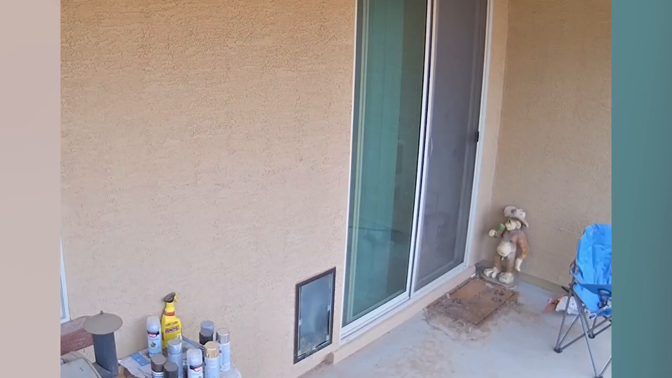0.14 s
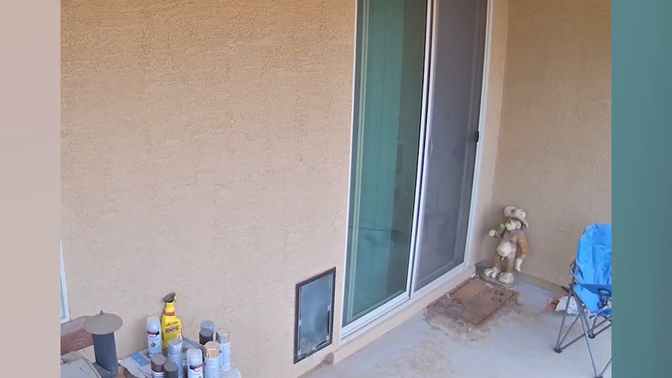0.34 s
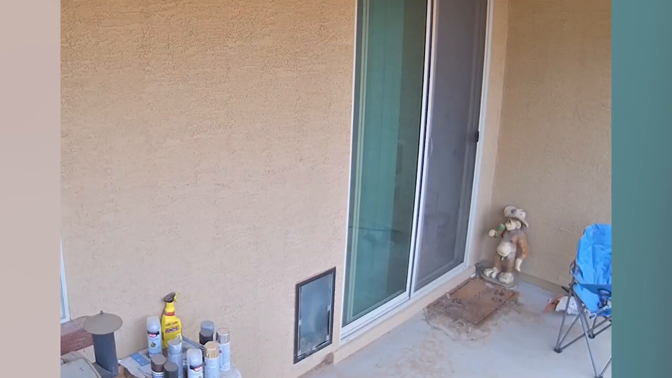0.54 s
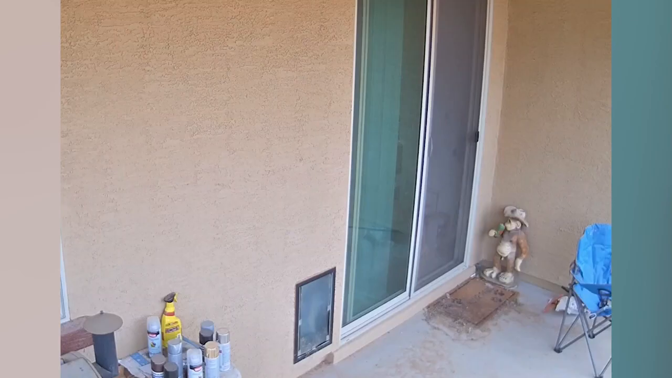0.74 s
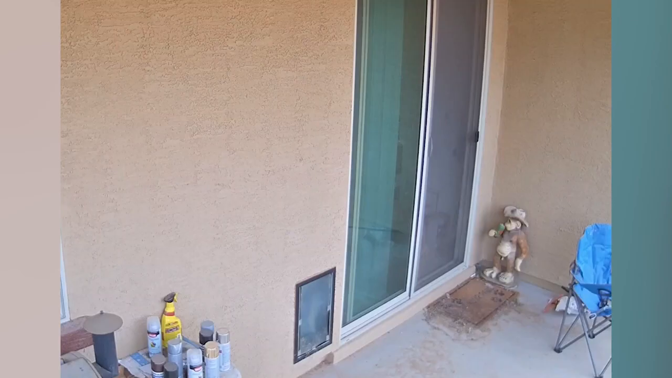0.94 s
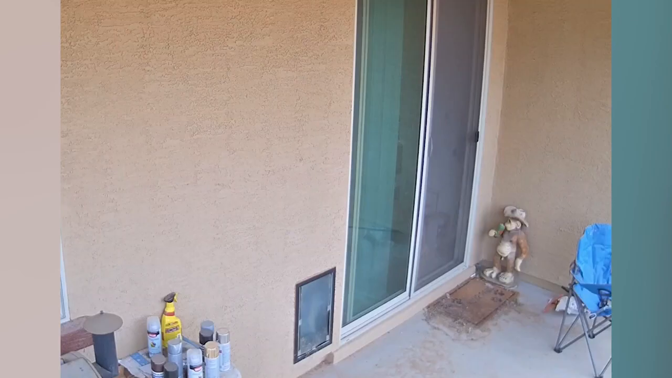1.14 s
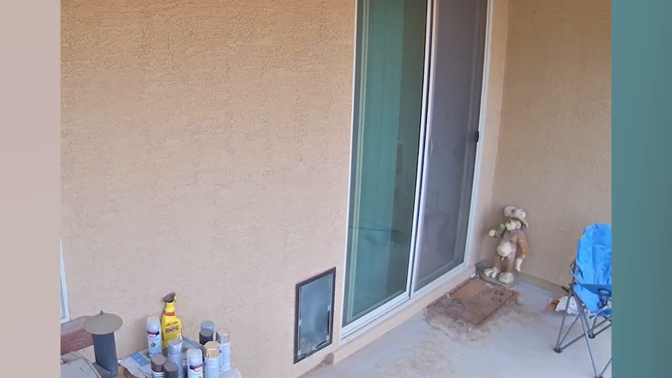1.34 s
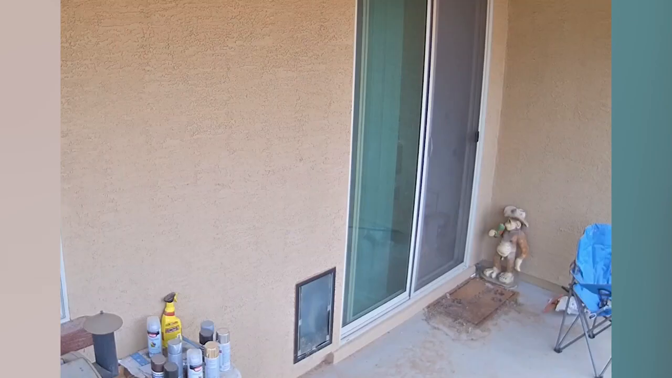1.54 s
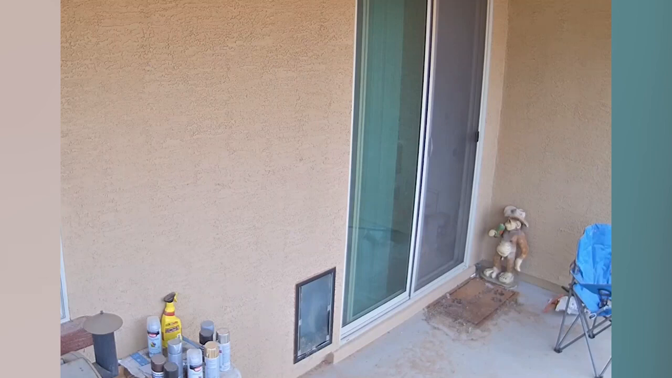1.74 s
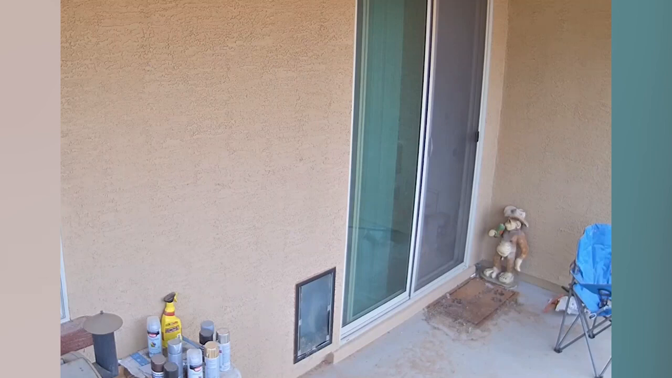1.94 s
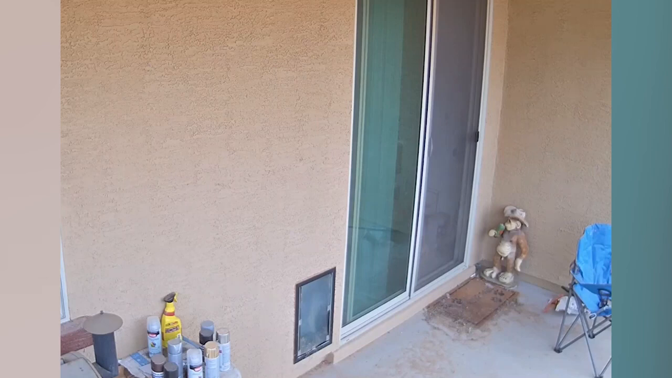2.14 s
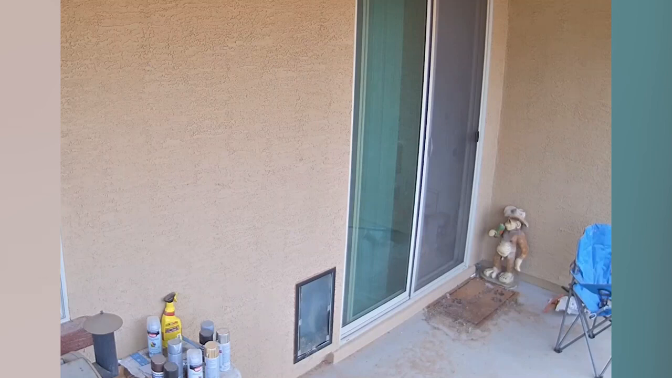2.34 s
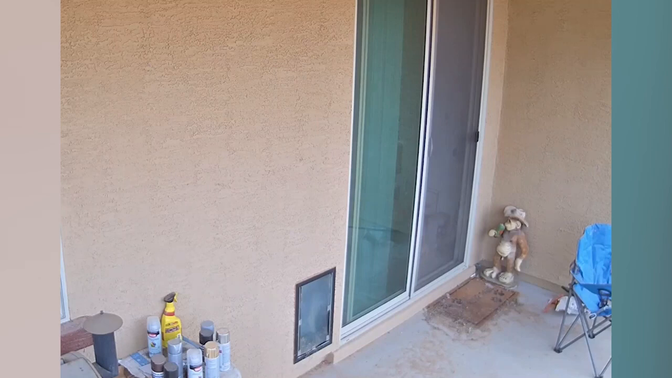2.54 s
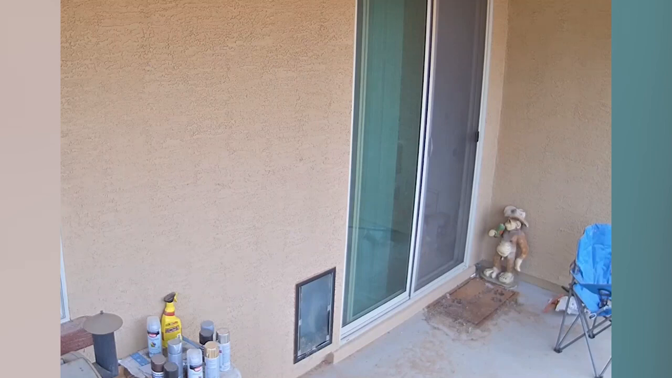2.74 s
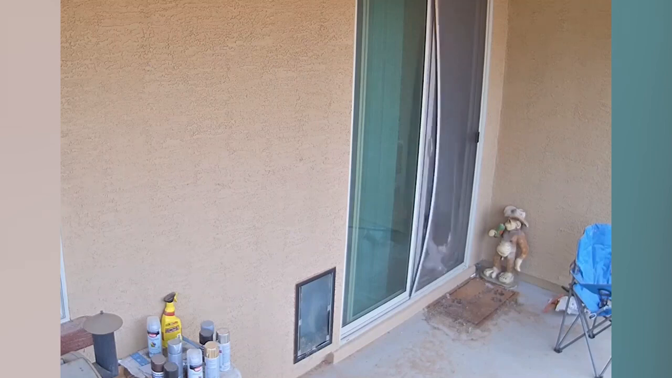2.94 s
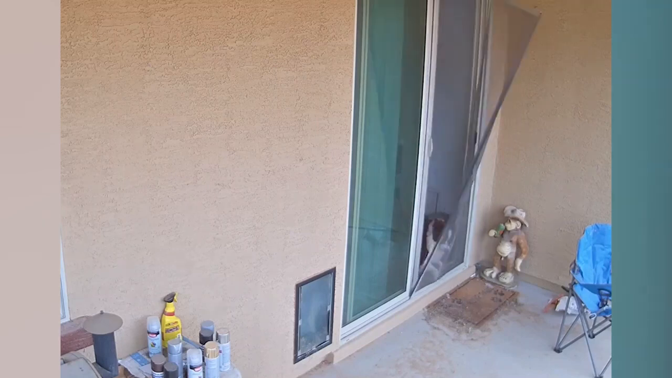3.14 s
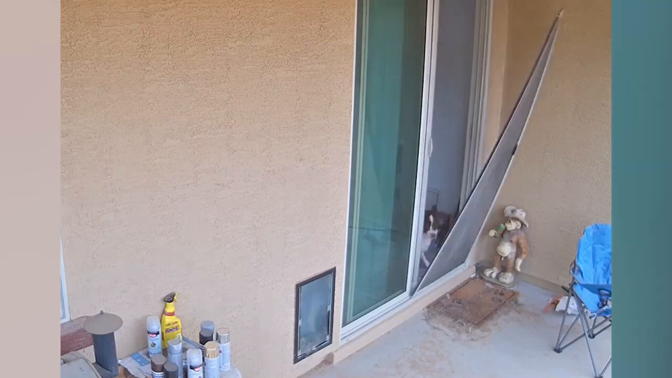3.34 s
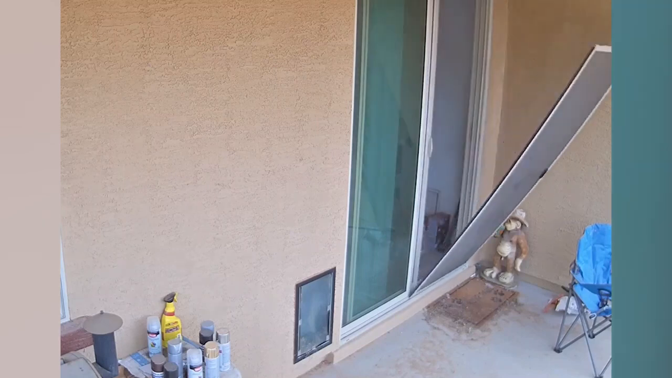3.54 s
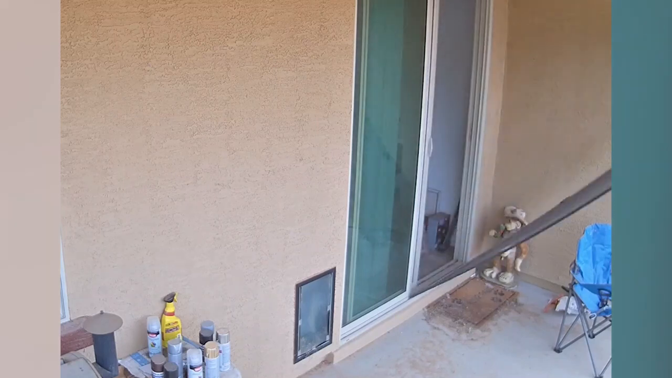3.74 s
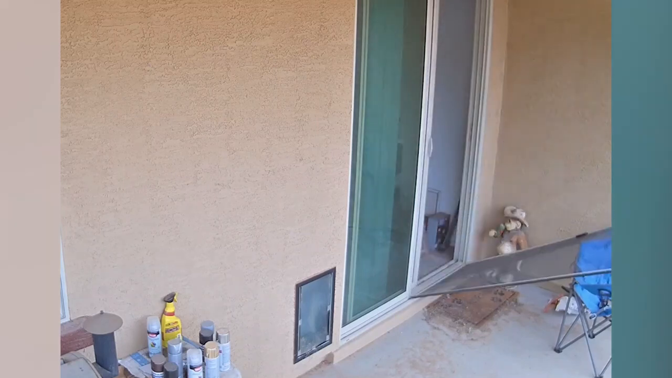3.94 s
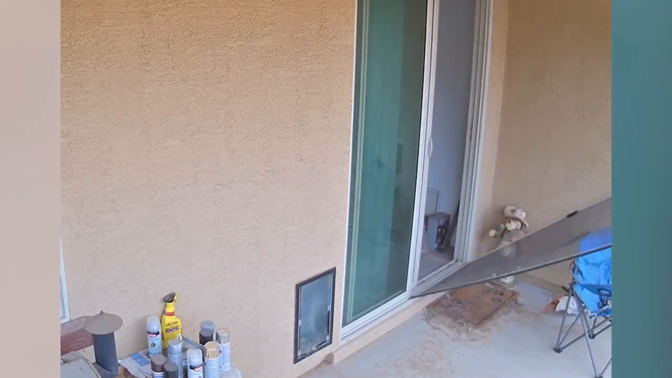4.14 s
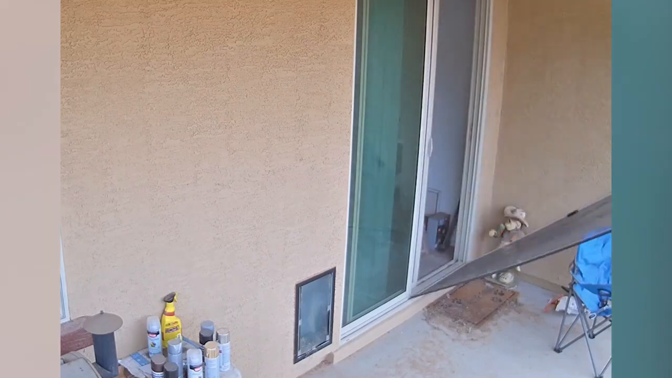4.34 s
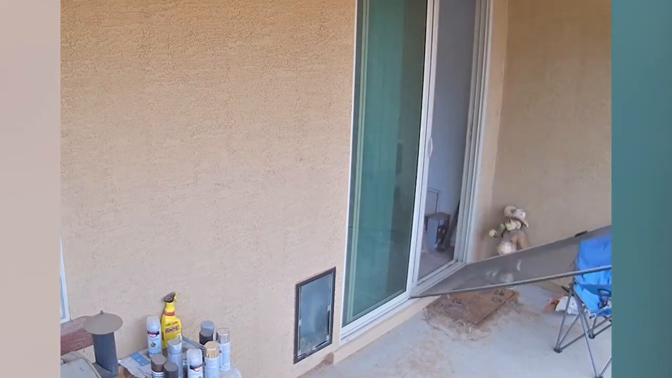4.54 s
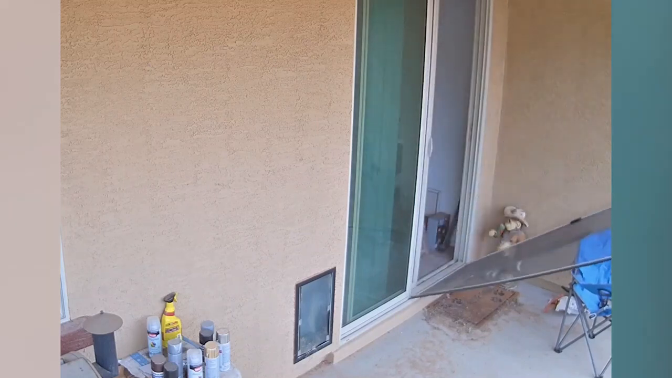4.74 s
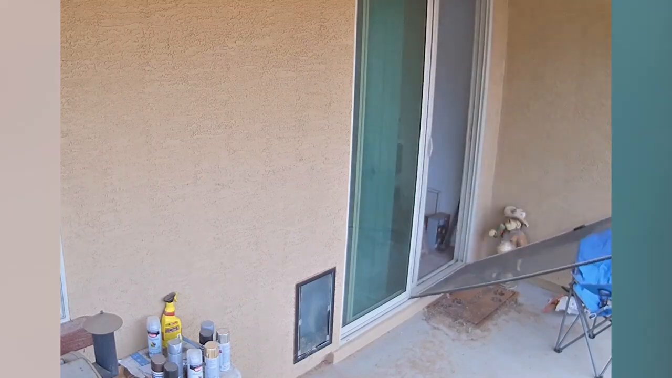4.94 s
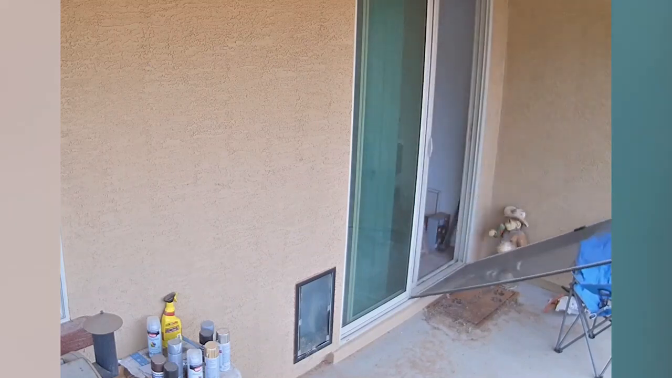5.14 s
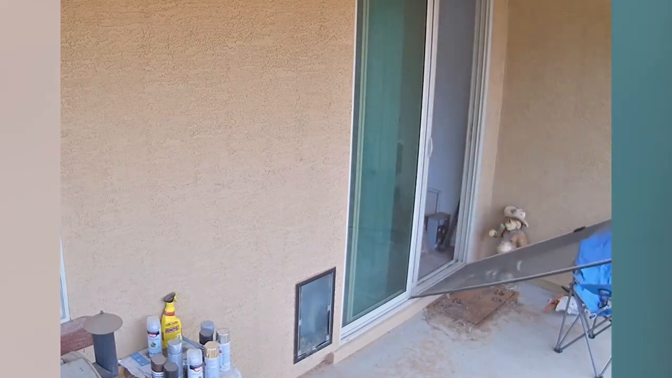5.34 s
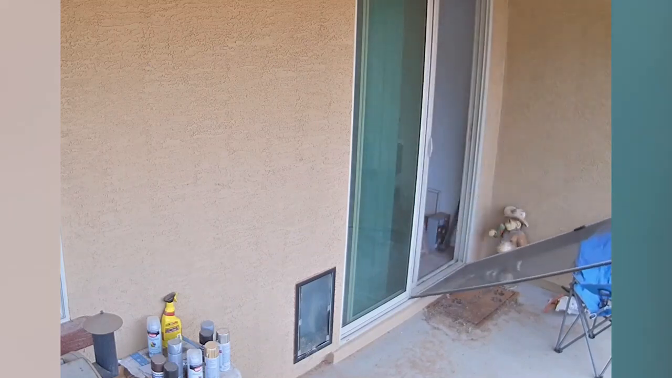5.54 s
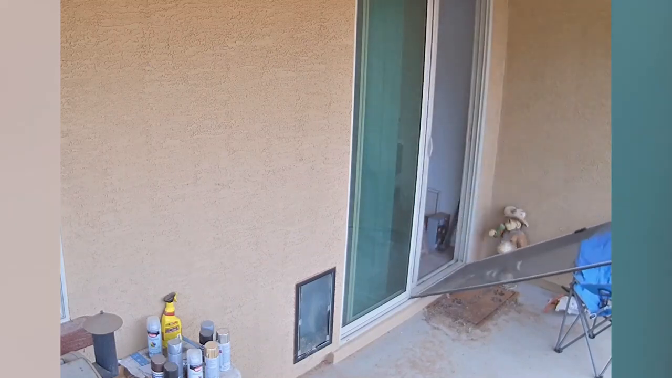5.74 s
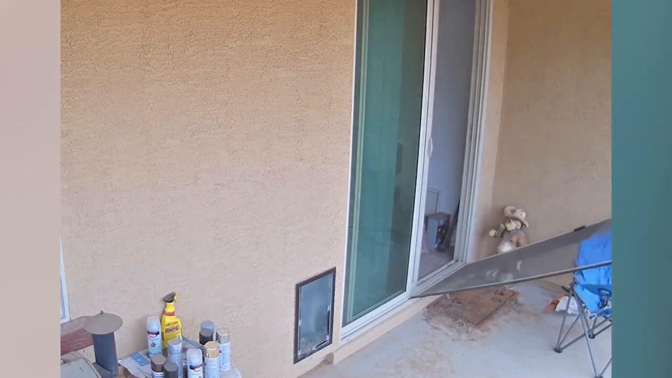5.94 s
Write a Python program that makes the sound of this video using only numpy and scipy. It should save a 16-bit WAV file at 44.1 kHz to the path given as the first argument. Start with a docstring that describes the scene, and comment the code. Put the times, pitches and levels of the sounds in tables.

```python
"""A finch sings gliding whistles over a yard's filtered noise hum, while grainy scuffs and damped wooden taps
come from indoors. Then a light metal screen door is knocked out of its track on a covered patio, topples, lands
on a folding chair and bounces to rest: short noise bursts and a dense rattle ring the modes of its frame, and
decaying noise gives the short echo of the walls. The air pushed by the fallen door buffets the small microphone
as low noise and pressure puffs, and the finch sings again."""
import sys
import numpy as np
from scipy import signal
from scipy.fft import rfft, irfft
from scipy.io import wavfile
from scipy.ndimage import uniform_filter1d

SR = 44100
rng = np.random.default_rng(int(sys.argv[2]) if len(sys.argv) > 2 else 0)


def materialize(psi):
    """Save the field psi as 16-bit PCM at rate SR to the path in sys.argv[1].

    A 1-D psi becomes a single channel; in a 2-D psi each row is a channel.
    """
    bounded = np.clip(np.atleast_2d(psi).T, -1, 1)
    quanta = np.round(bounded * 32767).astype(np.int16)
    wavfile.write(sys.argv[1], SR, quanta)


N = 268128
T = np.arange(N) / SR  # time, s


def undb(db):
    """Decibel law: amplitude ratio of a level in dB."""
    return 10 ** (np.asarray(db) / 20)


def unit(x):
    """Normalisation to an rms of 1."""
    return x / np.sqrt(np.mean(x ** 2))


def decay(t, t60):
    """Exponential decay: the amplitude falls by 60 dB in t60 seconds."""
    return np.exp(-np.log(1000) * t / t60)


def band(x, lo_hz, hi_hz, order=2):
    """Band limitation by a Butterworth filter."""
    return signal.sosfilt(signal.butter(order, [lo_hz, hi_hz], "band", fs=SR, output="sos"), x)


def colour(x, points, size=2048):
    """Minimum-phase filtering through (Hz, dB) points by the folded cepstrum of the log gain; unit energy."""
    hz, db = np.transpose(points)
    bins_hz = np.arange(size // 2 + 1) * SR / size
    log_gain = np.interp(np.log(bins_hz + 1), np.log(hz), db) * np.log(10) / 20
    cepstrum = irfft(log_gain)
    cepstrum[1:size // 2] *= 2
    cepstrum[size // 2 + 1:] = 0
    impulse = irfft(np.exp(rfft(cepstrum)))
    return signal.fftconvolve(x, impulse / np.sqrt(np.sum(impulse ** 2)))[:len(x)]


def walk(rate):
    """Slow random modulation: levels held 1 / rate seconds, smoothed twice, rms 1."""
    hold = int(SR / rate)
    steps = np.repeat(rng.standard_normal(N // hold + 1), hold)
    return unit(uniform_filter1d(uniform_filter1d(steps, hold), hold)[:N])


def clicks(rate, spread_db):
    """Shot noise: random contacts of both signs, most small, a few larger; rms 1."""
    chance, sign, size = rng.random((3, N))
    sizes = undb(-spread_db * np.log(size + 0.031))
    return unit((chance < rate / SR) * np.sign(sign - .5) * sizes)


def add(out, s, x):
    """Superposition: adds x to out from s seconds on."""
    i = int(s * SR)
    out[i:i + len(x)] += x[:N - i]


def swells(times, dbs, rise_s, fall_s):
    """Energy addition of events that grow exponentially to a peak and die away exponentially."""
    power = 0
    for s, db in zip(times, dbs):
        power = power + undb(2 * db) * np.exp(2 * np.minimum((T - s) / rise_s, (s - T) / fall_s))
    return np.sqrt(power)


# Spectral shape of the neighbourhood: pitch_hz [Hz], level_db [dB, relative]
YARD_SPECTRUM = [(35, -24.5), (60, -9.5), (116, 1.5), (179, -7), (348, -9), (390, -11), (755, -14),
                 (970, -13), (2590, -21), (3180, -20.5), (4790, -26), (6450, -65.5), (11400, -46),
                 (14000, -73)]
YARD_DB = -54
TRAFFIC_DB, TRAFFIC_FADE_S = 5.5, 0.24  # lift of the lower bands at the start, time constant of its fading


def yard():
    """Ambient noise: octave bands that flicker a little; a distant vehicle lifts the lower ones at first."""
    out, swell = 0, walk(0.54)
    for hz in 70 * 2. ** np.arange(8):
        traffic_db = TRAFFIC_DB * np.exp(-T / TRAFFIC_FADE_S) * (hz < 2000)
        level_db = traffic_db + 0.87 * swell + 1.0 * walk(6.8)
        out = out + undb(level_db) * band(rng.standard_normal(N), hz, 2 * hz, order=1)
    return unit(colour(out, YARD_SPECTRUM)) * undb(YARD_DB)


PATIO_T60_S, PATIO_DB = 0.42, -4.5
WALL_S, WALL_DB = 0.0338, -26  # delay and level of the far wall's return


def patio(x, count=40):
    """Reverberation: direct sound, diffuse tail of walls, roof and slab, and a return from the far wall."""
    t = T[:int(.6 * SR)]
    tail = decay(t, PATIO_T60_S) * np.clip(t / 0.0018, 0, 1)
    wall = np.exp(-.5 * ((t - WALL_S) / 0.00066) ** 2)
    shape = undb(PATIO_DB) * tail / np.sqrt(np.sum(tail ** 2))
    shape += undb(WALL_DB) * wall / np.sqrt(np.sum(wall ** 2))
    out = x.copy()
    # the fine structure of the echo changes as the sources move: crossfade fresh random tails
    for k in range(count + 1):
        share = np.sqrt(np.clip(1 - np.abs(T / T[-1] * count - k), 0, 1))
        near = np.flatnonzero(share)
        echo = signal.fftconvolve((x * share)[near], shape * rng.standard_normal(len(t)))
        add(out, near[0] / SR, echo)
    return out


GARDEN_T60_S, GARDEN_DB = .6, -7


def garden(x):
    """Late reflection: the long thin echo of the song from fences and house fronts."""
    t = T[:SR]
    tail = decay(t, GARDEN_T60_S) * np.clip(t / 0.017, 0, 1) * rng.standard_normal(len(t))
    return undb(GARDEN_DB) * signal.fftconvolve(x, tail / np.sqrt(np.sum(tail ** 2)))[:N]


# Blurred warbles: start_s [s], length_s [s], first_hz [Hz], last_hz [Hz], level_db [dB, relative]
FAR_WARBLES = [(.8, 0.31, 3620, 3540, -54), (1.043, .42, 4120, 4280, -56), (5.077, .18, 3260, 3180, -52),
               (5.424, .2, 3060, 3133, -60)]
BLUR_HZ = 170  # half width of the smeared band


def far_birds():
    """Scattering: distance and echo smear gliding warbles into a narrow wavering band."""
    out = np.zeros(N)
    for s, length, first_hz, last_hz, db in FAR_WARBLES:
        u = np.arange(0, 1, 1 / (length * SR))
        lowpass = signal.butter(2, BLUR_HZ, fs=SR)
        blur = unit(signal.lfilter(*lowpass, rng.standard_normal(SR)))[-len(u):]
        pitch = first_hz + (last_hz - first_hz) * u
        glide = np.sin(2 * np.pi * np.cumsum(pitch) / SR)
        add(out, s, undb(db) * blur * np.sqrt(np.sin(np.pi * u)) * glide)
    return out


# Gusts of air on the microphone: peak_s [s], level_db [dB, relative]
AIR_GUSTS = [(0.0, -49), (.15, -47.5), (.3, -58), (2.92, -40), (3.08, -38), (3.4, -51), (3.6, -55),
             (4.0, -46), (4.3, -51.5), (4.879, -35.5), (5.28, -47.5), (5.76, -41.5), (6.0, -50.5)]
# Single pressure puffs: start_s [s], level_db [peak dB, relative], pitch_hz [Hz]
AIR_PUFFS = [(4.867, -25, 72), (4.8882, -13.5, 120), (4.914, -29, 93.5), (5.182, -39.5, 38.5),
             (5.246, -40.5, 58), (5.641, -38, 51.7), (5.735, -34, 61), (5.755, -36, 86.5),
             (5.972, -36, 32.1), (6.059, -39, 69.8)]
BREEZE_DB, GUST_RISE_S, GUST_FALL_S = -62.5, 0.019, 0.058  # steady air, gust time constants


def buffeting():
    """Turbulent pressure: low noise of air at the microphone and puffs of one and a half cycles."""
    air = undb(BREEZE_DB) + swells(*np.transpose(AIR_GUSTS), GUST_RISE_S, GUST_FALL_S)
    out = unit(band(rng.standard_normal(N), 27, 112, order=3)) * air * undb(1.0 * walk(14))
    for s, puff_db, hz in AIR_PUFFS:
        u = np.arange(0, 1, hz / 1.5 / SR)
        add(out, s, undb(puff_db) * np.sin(np.pi * u) ** 2 * -np.sin(3 * np.pi * u))
    return out


# Scuffs: peak_s [s], level_db [dB, relative], top_level_db [dB of the airy top, relative]
SCUFF_EVENTS = [(.01, -54.5, -71.5), (.42, -64, -81), (.75, -64, -59), (.83, -52, -59), (.93, -58.5, -62.5),
                (1.25, -59, -57.5), (1.44, -57, -57.5), (1.82, -54, -69), (2.24, -51, -87),
                (2.48, -60, -76), (2.67, -48, -87), (2.75, -49, -73)]
SCUFF_RISE_S, SCUFF_FALL_S = 0.039, 0.0773
# Faint wooden taps: start_s [s], level_db [dB, relative]
WOOD_TAPS = [(.07, -52), (0.15, -45), (.24, -44), (0.257, -39), (.32, -48), (0.385, -43), (0.432, -42.5),
             (0.56, -44), (.648, -60)]
# Modes of the tapped wood: pitch_hz [Hz], level_db [dB, relative], t60_s [s]
WOOD_MODES = [(724, -7.5, 0.033), (890, -2.5, 0.048), (1014, 3, 0.028), (1187, 0, 0.028), (1300, -3, 0.022)]


def indoors():
    """Friction and modal decay: soft scuffs of dense grains behind the door and a few light wooden taps."""
    s, db, top_db = np.transpose(SCUFF_EVENTS)
    grain = clicks(5300, 2.9)
    airy = unit(band(grain, 3200, 5620, order=4) + undb(-13.5) * band(grain, 6500, 10300))
    out = swells(s, db, SCUFF_RISE_S, SCUFF_FALL_S) * unit(band(grain, 870, 3270, order=3))
    out += swells(s, top_db, SCUFF_RISE_S, SCUFF_FALL_S) * airy
    t = T[:int(.12 * SR)]
    for s, tap_db in WOOD_TAPS:
        wood = 0
        for hz, db, t60 in WOOD_MODES:
            mode_db = db + 1.9 * rng.standard_normal()  # each tap excites the modes a little differently
            wood = wood + undb(mode_db) * decay(t, t60) * np.sin(2 * np.pi * hz * t)
        add(out, s, undb(tap_db) * (1 - np.exp(-t / 0.0014)) * wood)
    return out


# Song notes: start_s [s], figure [name], pitch_hz [Hz, reference], level_db [dB, relative]
SONG_NOTES = [(.238, "pip", 4400, -61), (.532, "pip", 4300, -66), (0.253, "fall", 3417, -55),
              (0.369, "hook", 2680, -51.5), (.548, "fall", 3226, -59.5), (.712, "turn", 2730, -58),
              (.933, "pip", 2900, -53), (0.972, "fall", 2810, -63.5), (1.026, "fall", 3450, -61),
              (1.125, "fall", 3700, -52), (1.247, "dip", 4140, -49.5), (1.577, "fall", 3550, -58),
              (1.721, "hook", 2760, -56), (2.462, "fall", 3510, -61.5), (2.596, "slide", 2733, -61),
              (5.18, "fall", 3830, -68), (5.407, "fall", 3640, -55.5), (5.475, "fall", 2950, -58),
              (5.54, "dip", 4128, -54), (5.585, "sag", 4410, -60), (5.678, "slide", 2415, -61),
              (5.75, "fall", 2624, -61.5), (5.81, "slide", 2712, -65.5)]
# Pitch course of each named figure: share of the note [0-1], pitch [ratio to the reference]
SONG_FIGURES = {"fall": [(0, 1.4), (.5, 1.16), (.88, 1.02), (1, 1)], "hook": [(0, 1.5), (.1, 1.47),
                (.33, 1.15), (.58, 1), (.66, 1.27), (.72, 1.36), (.79, 1.29), (.95, .99), (1, .98)],
                "dip": [(0, 1.26), (.25, 1.06), (.55, 1), (.75, 1.01), (1, 1.11)], "pip": [(0, 1.08),
                (1, 1)], "sag": [(0, 1.12), (.5, 1.09), (1, 1)], "turn": [(0, 1.12), (.28, 1), (.4, 1.33),
                (.55, 1.35), (.85, 1.05), (1, .98)], "slide": [(0, 1.58), (.5, 1.2), (1, 1)]}
# Length of each named figure: length_s [s]
FIGURE_LENGTHS = {"fall": .037, "hook": .115, "dip": .07, "turn": .072, "slide": .065, "pip": .016, "sag":
                  .04}
FENCE_S, FENCE_DB = .013, -12  # a near surface doubles each note


def finch():
    """Frequency modulation: slightly husky gliding whistles, strongest a little after mid-note."""
    out = np.zeros(N)
    husk = undb(3 * walk(220))
    for s, figure, hz, db in SONG_NOTES:
        u = np.arange(0, 1, 1 / (FIGURE_LENGTHS[figure] * SR))
        course = np.interp(u, *np.transpose(SONG_FIGURES[figure]))
        pitch = hz * uniform_filter1d(course, size=150)
        whistle = np.sqrt(2) * np.sin(2 * np.pi * np.cumsum(pitch) / SR)
        shape = np.sin(np.pi * u ** 1.24) ** 0.64
        add(out, s, undb(db) * husk[int(s * SR):][:len(u)] * shape * whistle)
    return out + undb(FENCE_DB) * np.roll(out, int(FENCE_S * SR))


EDGE_PER_CRACK = 0.3  # dB of edge per dB of crack


def contacts(table, swell, edge_db, grain_db):
    """Impact excitation: each contact has body, thud, edge and crack; swell = rise time over fall time."""
    t = T[:int(.2 * SR)]
    parts = np.zeros((4, N))
    for s, db, hz, thud_db, thud_hz, crack_db, ms in table:
        fall = max(ms, .5) / 1000
        n = rng.standard_normal((3, len(t)))
        shape = (1 - np.exp(-t / (swell * fall))) ** 2 * np.exp(-t / fall)
        # uneven knock sizes make the contact grainy
        chatter = n[0] * undb(grain_db * n[2]) * shape
        chatter *= undb(-1.0) * np.sqrt(np.sum(shape ** 2) / np.sum(chatter ** 2)) / shape.max()
        # the part that is struck favours its own tone
        body = chatter + undb(10.5) * band(chatter, hz / 1.167, hz * 1.307, order=1)
        fade = np.exp(-t / (fall + 0.015))
        thud = unit(band(n[1] * fade, thud_hz / 1.795, thud_hz * 1.436, order=3))
        thud *= undb(thud_db + 1.5) * np.sqrt(np.mean(fade ** 2))
        edge = undb(edge_db + EDGE_PER_CRACK * (crack_db + 44)) * chatter
        crack = undb(crack_db - 1.0) * chatter * shape / shape.max()
        for part, x in zip(parts, (body, thud, edge, crack)):
            add(part, s - swell * fall, undb(db) * x)
    return parts


# Modes of the frame tubes, damped by the taut mesh: pitch_hz [Hz], level_db [dB, relative], t60_s [s]
TUBE_MODES = [(777, -7.5, 0.12), (953, -7.5, 0.082), (1170, -9, .06), (1334, -10.5, .14), (1462, -8, .14),
              (1608, -15, .12), (1754, -15.5, 0.061), (1956, -13.5, 0.034), (2054, -33, 0.042),
              (2400, -17, 0.0793), (2595, -26, 0.0811), (3015, -18.5, 0.064), (3190, -9, 0.14)]
BEND_SHARE = .012  # rms share by which the tones wander


def ring(x):
    """Modal resonance: the frame tubes ring briefly at modes that drift as the frame bends."""
    out = 0
    for hz, db, t60 in TUBE_MODES:
        drifting_hz = hz * (1 + BEND_SHARE * walk(6))
        turn = np.exp(2j * np.pi * np.cumsum(drifting_hz) / SR)
        # shift the mode to 0 Hz, let it decay there, shift it back
        envelope = signal.lfilter([1], [1, -decay(1 / SR, t60)], x / turn)
        out = out + undb(db) * np.real(turn * envelope)
    return out


# Sharp blows on the frame: time_s [s, one rise time after onset], level_db [dB, relative],
# pitch_hz [Hz, of the struck part], thud_level_db [dB, relative], thud_pitch_hz [Hz],
# crack_level_db [dB, relative], fall_ms [ms, time constant]
FRAME_BLOWS = [(2.8861, -1.5, 1850, -44, 248, -28, 2.82), (2.8915, -9, 1900, -53, 252, -49.5, 2.4),
               (2.9225, -6, 1660, -16.5, 267, -47, 2.6), (2.928, -10, 1760, -13, 90, -53, 5.1),
               (2.9537, -12.5, 1610, -18, 313, -44.5, 6.5), (3.0195, -4.5, 1930, -17, 133.6, -59, 1.25),
               (3.3235, 0, 2840, -29, 141, -22, 1.9), (3.329, -15, 2650, -21, 300, -44, 5.4),
               (3.4252, -11.5, 2480, -34.5, 420, -49.5, 2.6), (3.4988, 3, 3370, -27, 437, -23.5, 1.2),
               (3.5045, -9, 3200, -28.5, 440, -47.5, 3.5), (3.6184, -0.5, 1900, -38.5, 405, -34, 1.74),
               (3.6215, -4.5, 2090, -26.5, 410, -51.5, 2.66), (3.8615, -20.5, 1600, -4.5, 724, -57.5, 5.5),
               (3.9011, -6.5, 2040, -15.5, 460, -65.5, 5.1), (4.0474, -2.5, 1820, -22, 895, -25, 2.1),
               (4.5402, -9.5, 1830, -5, 755, -62, 3.7), (4.5465, -7, 2820, -15, 527, -53, 3.2),
               (4.5515, -8.5, 1620, -10.5, 330, -60, 2.9), (4.5628, -10, 1720, -15, 790, -55, 4),
               (4.5752, -10.5, 1480, -5, 770, -59, 1.8), (4.9672, -14.5, 1900, -10.5, 685, -44, 2.95),
               (4.972, -25.5, 1520, 0.5, 727, -35, 16.6)]
# Jolts, a cluster of small knocks that swells and fades: columns and units as for the blows
FRAME_JOLTS = [(2.8321, -33, 1760, -5, 470, -32, 6.37), (2.855, -16, 1650, -6, 217, -43, 2.5),
               (2.9053, -18, 1550, 1, 218, -28, 8.1), (2.9426, -14, 2710, -27, 316, -39, 9.2),
               (2.9882, -19, 1670, -15, 121, -46, 5.1), (3.05, -17.5, 1870, -23, 151.6, -23, 11.4),
               (3.0765, -9, 2700, -5.5, 138, -45.5, 6.5), (3.0835, -5, 2500, -9, 387, -39, 5.1),
               (3.0975, -11.5, 2280, -19, 179, -35, 4.8), (3.2235, -23.5, 1440, -3, 116.6, -56, 6),
               (3.2755, -15.5, 2010, -28.5, 480, -44, 11.8), (3.3497, -18, 1580, -13, 122, -45.5, 6.3),
               (3.4075, -7, 2100, -6.5, 406, -57, 3.07), (3.413, -7.5, 2740, -16, 430, -52, 4.3),
               (3.5368, -18, 1670, -16, 487, -66, 8), (3.8375, -29, 1480, -20, 410, -56, 8.2),
               (3.9398, -17.5, 1150, -4.5, 416, -37.5, 8.3), (3.9679, -17.5, 2900, -8.5, 113, -33.5, 7.3),
               (4.0747, -19.5, 1120, -12, 880, -75, 8.8), (4.1065, -17, 1630, -14, 467, -69, 3.9),
               (4.128, -31, 1600, -23, 480, -42.5, 7.6), (4.2064, -28, 2110, -25, 180, -34, 11.3),
               (4.2771, -25, 1500, -38, 127, -56, 5.3), (4.3333, -29, 1830, -29, 864, -37, 13.3),
               (4.392, -32, 1940, -43, 288, -34.5, 13), (4.4645, -32, 1350, -36, 116, -33, 10.7),
               (4.527, -33, 2000, -31, 505, -31, 14.6), (4.587, -22, 1450, -17, 900, -43, 5.7),
               (4.602, -22, 1150, -11, 800, -43.5, 9.8), (4.7152, -38, 1990, 2.5, 610, -25, 7.7),
               (4.728, -28, 1710, -21, 600, -34, 8), (4.7678, -30, 1660, -13, 315, -28, 11.8),
               (4.8385, -32.5, 1370, -3, 128, -50, 8.8), (4.9076, -34, 1470, -11, 102, -55, 11.37),
               (4.9422, -32.5, 1480, -24, 524, -51, 11.5), (5.037, -30.5, 1400, -9, 762, -28.5, 11.8),
               (5.2432, -34, 1777, -18, 102, -46, 10.6), (5.27, -44.5, 3380, -19, 120, -20, 16),
               (5.305, -40.5, 1510, -21, 200, -42.5, 8.9), (5.326, -42, 1540, -16, 121, -48, 7.5),
               (5.36, -51, 1450, -24, 121, -47.5, 7.87), (5.4056, -37.5, 1590, -10, 112, -49, 11.8),
               (5.634, -39.5, 1970, 1.5, 102, -31, 4), (5.648, -46, 3500, -24, 102, -17.5, 11.6),
               (5.6937, -46, 1880, -13.5, 102, -52, 15.2)]
# Loose frame and mesh shaking: time_s [s], level_db [dB, relative]
RATTLE_LEVELS = [(2.82, -58), (2.835, -29), (2.87, -27.5), (2.96, -20.5), (3.06, -24), (3.12, -25),
                 (3.2, -33), (3.3, -24), (3.46, -24.5), (3.56, -21.5), (3.65, -29.5), (3.74, -37),
                 (3.85, -37.5), (3.97, -23.5), (4.04, -37.5), (4.12, -34), (4.31, -43.5), (4.52, -42.5),
                 (4.62, -31.5), (4.69, -42.5), (4.92, -40.5), (5.08, -47.5), (5.2, -58.5), (5.33, -47),
                 (5.5, -59), (5.9, -65.5)]
# Radiation of the struck frame: pitch_hz [Hz], level_db [dB, relative]
FRAME_SPECTRUM = [(410, -32), (650, -22.5), (770, -13), (958, -7), (1180, -4), (1580, 0.5), (2220, -4),
                  (2560, -6), (2840, -6), (3320, -4), (5060, -19.5), (6570, -67), (16000, -83)]
# Radiation of the flexing panel: pitch_hz [Hz], level_db [dB, relative]
PANEL_SPECTRUM = [(24, -44), (45, -18), (129, -3), (190, -5), (260, 0), (340, -5), (430, 1.5), (500, 0),
                  (620, -16.5), (900, -11.5), (1170, -41.5), (1980, -120)]
BLOW_EDGE_DB, JOLT_EDGE_DB = -19, -9  # edge, relative, at a tabled crack level of -44 dB
BOOM_DB, FIZZ_DB = -13, -14.5  # flexing panel and mesh, re the rattle's level curve
LANDS_S, RESTING_DB = 4.06, -6  # once the door lies on the chair the panel flexes less


def door():
    """Structure-borne sound: blows and jolts ring the frame, loose parts rattle, mesh fizzes, panel booms.
    Returns the body of the sound, and its top and thuds, which the rough, open patio hardly sends back."""
    blows = contacts(FRAME_BLOWS, 0.081, BLOW_EDGE_DB, 1.7)
    jolts = contacts(FRAME_JOLTS, 1.2, JOLT_EDGE_DB, 4.1)
    body, thud, edge, crack = blows + jolts
    s, db = np.transpose(RATTLE_LEVELS)
    rattle_db = np.interp(T, s, db, -120, -120)
    rattle = clicks(600, 3) * undb(rattle_db + 2.2 * walk(70))
    fizz = unit(band(clicks(1200, 3), 2200, 6070)) * undb(rattle_db + FIZZ_DB + 3.2 * walk(45))
    boom_db = rattle_db + BOOM_DB + RESTING_DB * (T > LANDS_S) + 6.4 * walk(22.04)
    boom = colour(rng.standard_normal(N), PANEL_SPECTRUM) * undb(boom_db)
    metal = colour(undb(-10.5) * body + rattle, FRAME_SPECTRUM)
    tubes = undb(-45) * ring(body + undb(1.0) * rattle)
    bright_edge = band(edge, 3400, 5900, order=4)
    top = undb(8.0) * band(crack + undb(-33) * rattle, 6200, 11100, order=3)
    return metal + tubes + fizz + boom + bright_edge, top + undb(-9.5) * thud


def scene():
    """Superposition of direct and reflected sound; the bird, out in the open, arrives a little drier."""
    bird = finch()
    body, extremes = door()
    wet = patio(body + undb(-11.5) * extremes + indoors() + undb(-3.0) * bird)
    open_air = undb(-4.5) * bird + garden(undb(-0.5) * bird) + far_birds()
    return (wet + extremes + open_air + buffeting() + yard())[None]


# Overall tone colour of the sound, duller above 6 kHz: pitch_hz [Hz], level_db [dB, relative]
TONE_COLOUR = [(20, 3.5), (5600, -3), (6100, -6.5), (6500, -11.5), (9000, -11.5), (11500, -3.5),
               (16000, -17.5)]
CEILING, TOP_HZ = .8, 15700  # limit of the soft rounding (amplitude), upper band edge


def record(dry):
    """Linear filtering and saturation: treble dulled above 6 kHz, faint hiss, rounded peaks, top cut off."""
    hiss = undb(-86.5) * unit(band(rng.standard_normal(N), 4800, 11000))
    heard = colour(dry[0], TONE_COLOUR)[None] * undb(-6.0) + hiss
    soft = heard / (1 + np.abs(heard / CEILING) ** 6) ** (1 / 6)
    return signal.sosfilt(signal.ellip(8, .2, 80, TOP_HZ, fs=SR, output="sos"), soft)


dry = scene()
out = record(dry)
materialize(out)
```